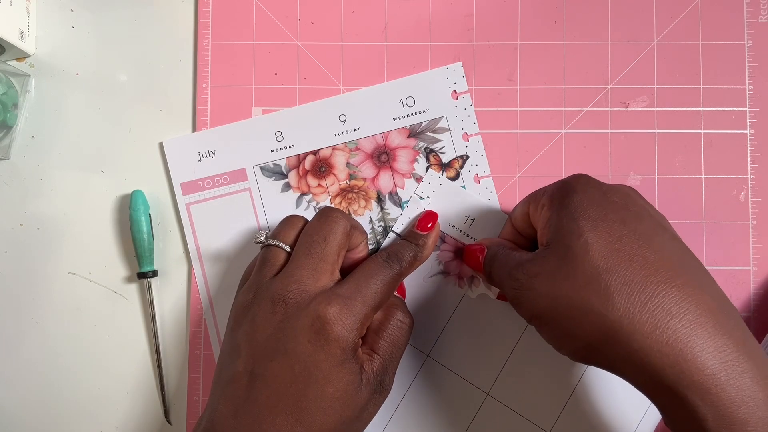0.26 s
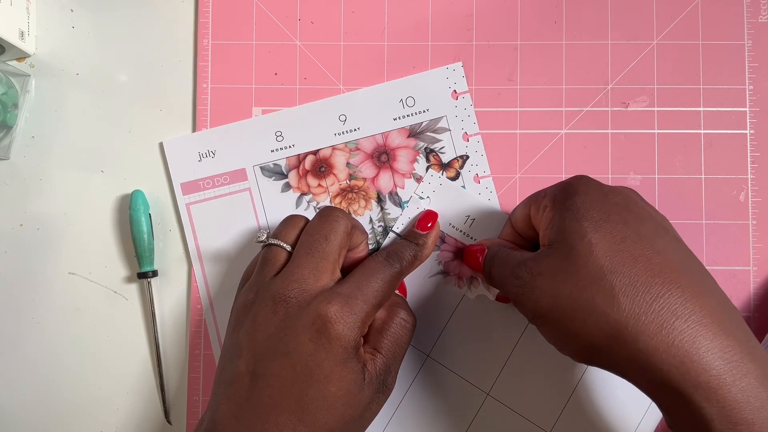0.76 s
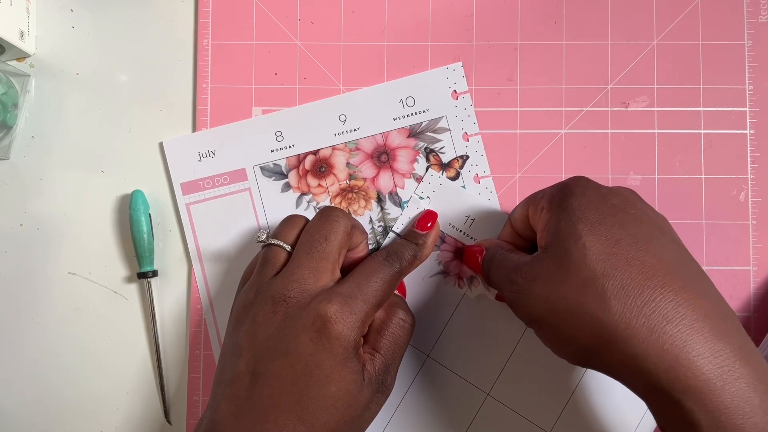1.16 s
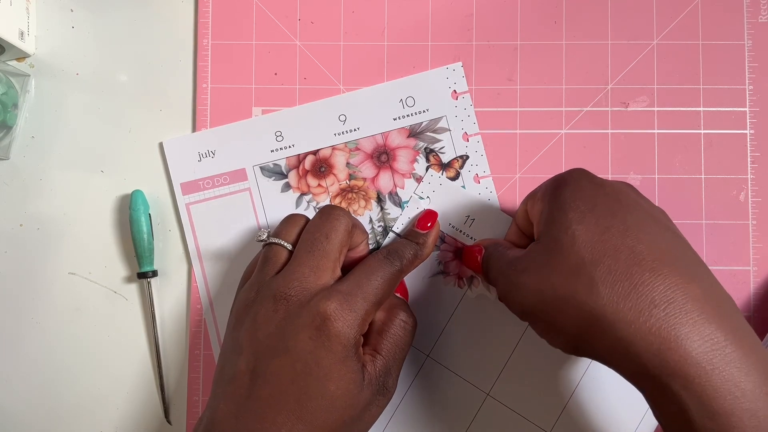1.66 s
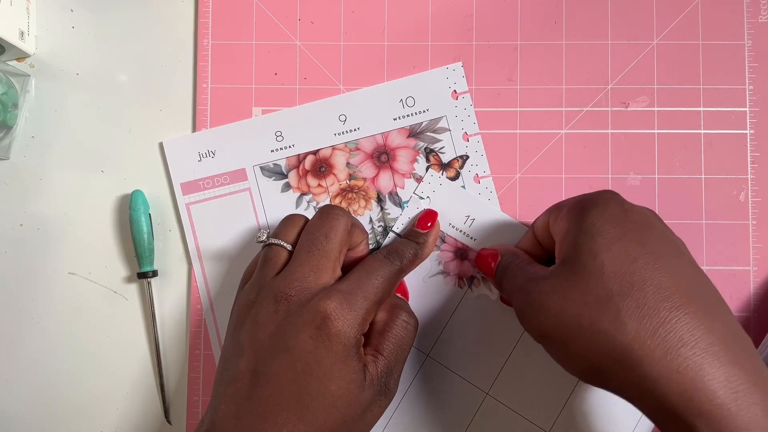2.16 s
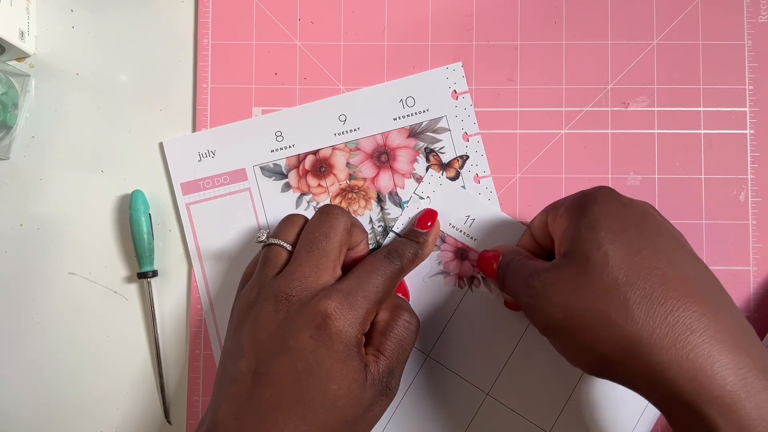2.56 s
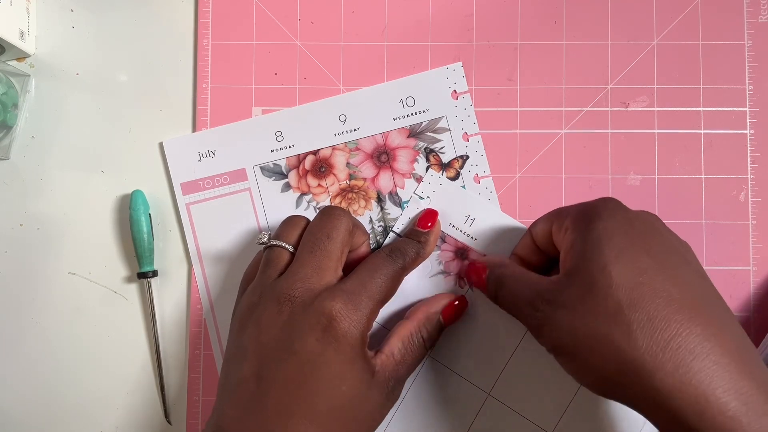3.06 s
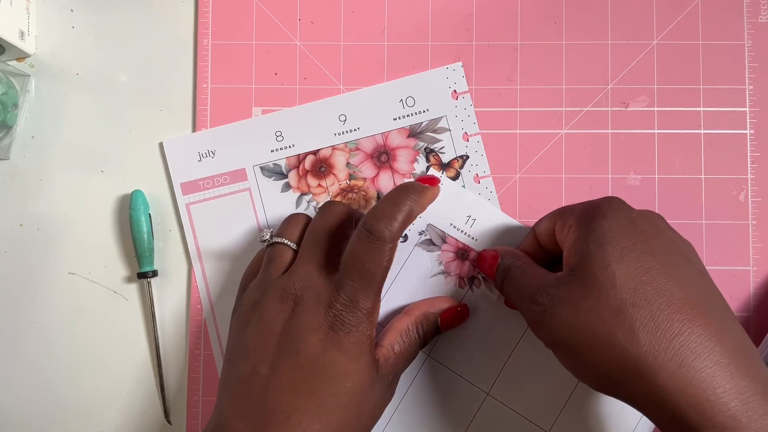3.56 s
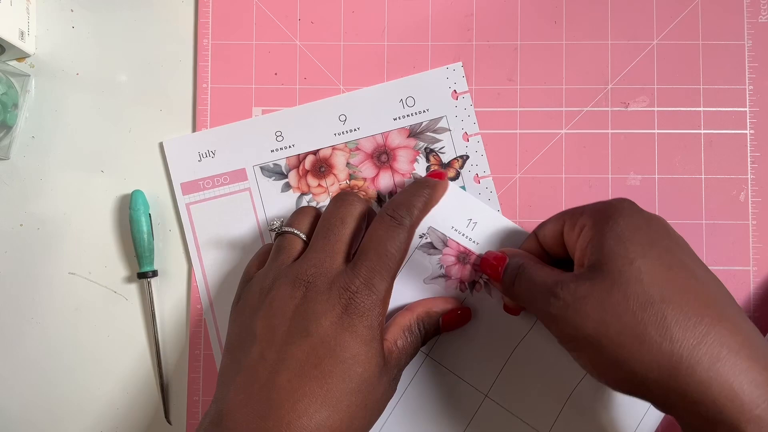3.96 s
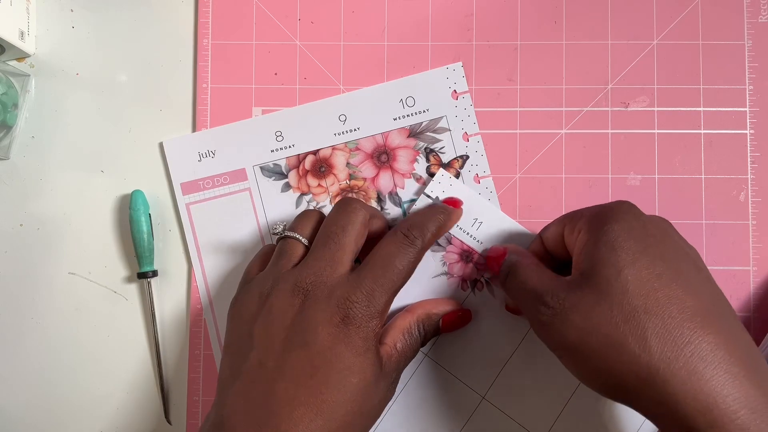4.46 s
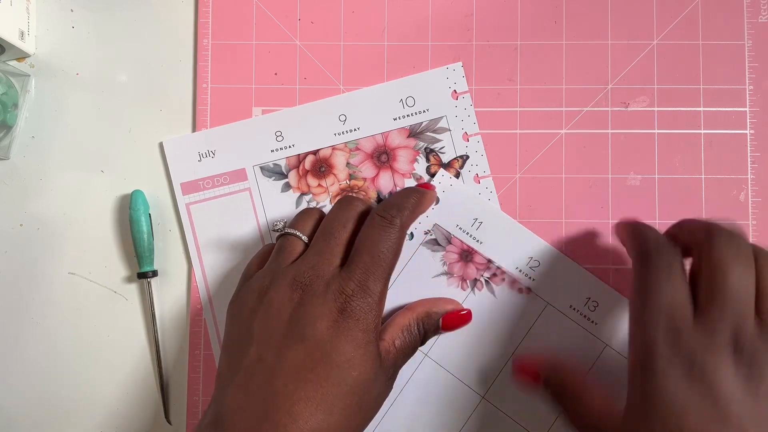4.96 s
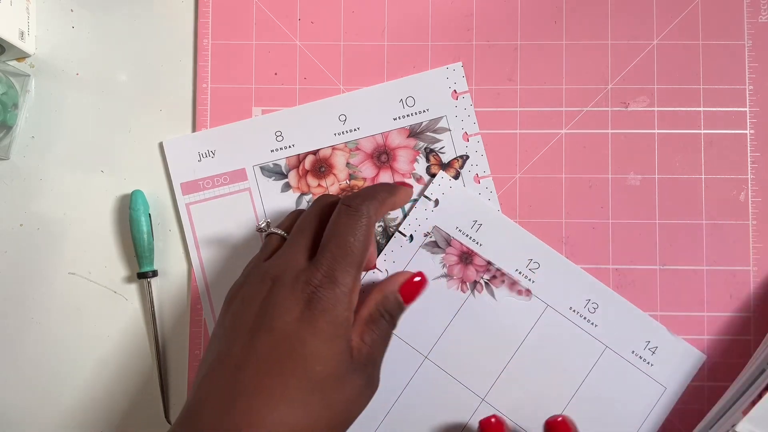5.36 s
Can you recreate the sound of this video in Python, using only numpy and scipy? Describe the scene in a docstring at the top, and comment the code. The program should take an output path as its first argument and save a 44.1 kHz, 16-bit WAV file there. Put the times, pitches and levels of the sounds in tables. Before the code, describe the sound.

Close, dry paper handling: sparse ticks, soft fingertip thuds, a busy burst of rustle and flaps, later one hard snap, above quiet fan hum.

```python
"""A sticker peels and is pressed on a paper page lying on a desk mat, heard close and in stereo.
Glue and paper let go in snaps: short runs of cracks, heard bare and striking the modes of the sheet.
Skin and sticker rub the page: grainy noise in bands, with wavering resonances lifted out of it.
Nails knock hollow notes, pages flap as short dull rings and fingertips shake the low desk modes.
Behind them fan and mains hum in wavering sines; the fan moves air as banded noise and squeaks faintly."""
import sys
import numpy as np
from scipy import signal
from scipy.fft import rfft, irfft, next_fast_len
from scipy.io import wavfile

SR = 44100
rng = np.random.default_rng(int(sys.argv[2]) if len(sys.argv) > 2 else 0)


def inscribe(sig):
    """Save sig as 16-bit PCM at rate SR to the path in sys.argv[1].

    A 1-D sig is mono; a 2-D sig holds one channel per row.
    Samples are clipped to [-1, 1] before scaling.
    """
    pcm = np.round(np.clip(np.atleast_2d(sig).T, -1, 1) * 32767)
    wavfile.write(sys.argv[1], SR, pcm.astype(np.int16))


N = 247128

# strokes of skin and sticker over the page, levels before the rub's makeup gain: [start t/s, length/s,
# rasp level at start/dB, rasp level at end/dB, rise/(dB/s), fall/(dB/s), low rasp over rasp/dB,
# skin hiss over rasp/dB, top hiss over hiss/dB, page body over rasp/dB]
STROKES = [(0.215, 0.0081, -63.5, -81, 903, 600, -3, -1, -2, -8),
           (0.538, 0.13, -76.5, -83, 908, 455, 6, 9.5, 8, -9),
           (1.83, 0.16, -75.5, -75.5, 602, 450, -4, 0, -1, 22),
           (2.011, 0.22, -69, -72.5, 398, 450, 9, 7, -3.5, 13),
           (2.337, 0.046, -70.5, -74, 600, 448, 13.5, 2.5, -10, 23.5),
           (2.483, 0.19, -77.5, -76.5, 602, 458, -6, 5.5, -3, -8),
           (2.62, 0.14, -74.5, -71, 603, 454, 11.5, -1, -14, 14.5),
           (2.875, 0.15, -65, -59, 900, 900, 4.5, -6, 1, -10),
           (2.984, 0.072, -62.5, -55, 3002, 450, 2.5, -4, 10, 6.5),
           (3.078, 0.062, -56.5, -51, 402, 1200, -5, 2, -0.5, -2),
           (3.177, 0.043, -63, -70.5, 600, 454, 9.5, 1.5, -10, 12),
           (3.226, 0.1, -55, -54, 1502, 499, 1.5, -0.5, 2, 9.5),
           (3.59, 0.059, -60.5, -51, 899.5, 450, 1, -3.5, 1, 1),
           (3.693, 0.02, -51, -52.5, 601, 600, -0.5, -3, 3, -8.5),
           (3.709, 0.014, -53, -56.5, 2998.5, 450, 9, 3, 1, 7),
           (3.745, 0.096, -65.5, -57, 600, 450, 7, 0, -2, 3.5),
           (3.876, 0.063, -53.5, -54.5, 402, 450, 4, -4, 2, -7),
           (3.939, 0.028, -53.5, -46.5, 900, 449, 5, -11, 8, -7),
           (3.978, 0.018, -46.5, -48.5, 902, 550, -2, -6.5, 6, -24),
           (4.019, 0.054, -66, -67.5, 597, 445, -2, -4.5, -3, 11),
           (4.278, 0.016, -64, -58.5, 899, 445, -5, -7.5, -16, -6),
           (4.419, 0.063, -60.5, -58, 3003, 600, -10.5, 0.5, 1, -9.5),
           (4.498, 0.026, -48.5, -58, 2003, 700, 2.5, 2, -7, 2.5),
           (4.539, 0.089, -53.5, -74.5, 3000, 450, -11, -2.5, 2, 3.5),
           (4.652, 0.014, -60, -62, 900, 900, 8, -2, -6, -2),
           (4.67, 0.028, -45, -65, 6004, 446, 3, 11, 2, 10.5),
           (4.713, 0.073, -66.5, -68, 604, 250, 8, -1, 9, 12.5),
           (5.146, 0.037, -70, -64.5, 2997.5, 600, 4, 6.5, 2, 15),
           (5.22, 0.17, -72, -73, 597.5, 453, 10, -9.5, -1, 20),
           (5.47, 0.017, -68.5, -59, 5999, 1189, -1.5, 8, 8, 1),
           (5.496, 0.043, -79, -80, 2998, 445, 3, 5, 7, -13)]


def from_db(db):
    """Amplitude gain of a level in dB."""
    return 10 ** (np.asarray(db) / 20)


def rms_one(x):
    """Scale a signal to unit power."""
    return x / np.sqrt(np.mean(x ** 2) + 1e-20)


def at_hz(points, hz):
    """Read a table of (Hz, value) on a log-frequency axis, flat beyond its ends."""
    table_hz, values = np.array(points).T
    return np.interp(np.log(hz), np.log(table_hz), values)


def drift(rate):
    """Slow random wander of spread 1: noise through two equal poles at rate (Hz), drawn every 40 samples."""
    r = np.exp(-80 * np.pi * rate / SR)
    noise = rng.standard_normal(N // 40 + 2002)
    slow = signal.lfilter([1], [1, -2 * r, r * r], noise)[2000:]  # drop the settling
    return np.interp(np.arange(N) / 40, np.arange(len(slow)), rms_one(slow))


def ring(x, hz, t60):
    """Damped resonator: a unit click sets a sine of height 1 ringing, down 60 dB after t60 seconds."""
    r, w = from_db(-60 / (t60 * SR)), 2 * np.pi * hz / SR
    return signal.lfilter([0, np.sin(w)], [1, -2 * r * np.cos(w), r * r], x + 1e-18)


def bands(spectrum, likeness, grain, gain_db):
    """Stereo noise in third-octave bands, unit power at 0 dB; gain_db(hz) moves each band in time."""
    edges = 20.5 * 2 ** np.arange(0, 9.7, 1 / 3)
    white = rng.standard_normal((2, 2, N)) * grain
    out, power = 0, 0
    for k, (low, high) in enumerate(zip(edges, edges[1:])):
        hz = np.sqrt(low * high)
        density_db = at_hz(spectrum, hz)
        power += from_db(density_db) ** 2 * (high - low)
        if hz < spectrum[0][0]:
            continue
        bandpass = signal.butter(3, [low, high], "band", fs=SR, output="sos")
        mid, side = signal.sosfilt(bandpass, white[k % 2])  # neighbouring bands use separate noises
        alike = np.clip(at_hz(likeness, hz), 0, 1)
        stereo = np.sqrt(1 + alike) * mid + np.sqrt(1 - alike) * side * [[1], [-1]]
        out = out + from_db(density_db + gain_db(hz)) * stereo
    return out * np.sqrt(SR / 4 / power)


def room(x):
    """Dense dull reflections: decaying lowpassed noise, unrelated in the two channels."""
    t60_s, build_up_s, tail_db, wall_cut_hz = .07, 0.00054, -26, 4350
    t = np.arange(int(t60_s * SR)) / SR
    envelope = from_db(-60 * t / t60_s) * np.clip(t / build_up_s, 0, 1)
    tail = rng.standard_normal((2, len(t))) * envelope
    tail = signal.sosfilt(signal.butter(2, wall_cut_hz, fs=SR, output="sos"), tail)
    return from_db(tail_db) * signal.fftconvolve(x[None], tail, axes=1)[:, :N]


def fan_and_mains_hum():
    """Hum lines of the fan and the mains: sines share one pitch wander and waver separately in level."""
    # hum lines of the fan and the mains: [f/Hz, rms level before wavering/dB]
    hum_lines = [(31.5, -68.5), (64.4, -54.5), (120, -61.5), (128.7, -54.5), (240, -75), (257.6, -66.5),
                 (322, -68), (387, -73.5)]
    t = np.arange(N) / SR
    time_wander = np.cumsum(0.00609 * drift(1.55)) / SR
    hum = np.zeros(N)
    for hz, db in hum_lines:
        gain = np.sqrt(2) * from_db(db + 3.0 * drift(5.5))
        hum += gain * np.sin(2 * np.pi * (hz * (t + time_wander) + rng.random()))
    return hum


def fan_air():
    """Moving air: banded stereo noise, each band drifting gently in level."""
    # tone of the air: [f/Hz, relative power density/dB per Hz]
    air_colour = [(20, -5.5), (30, 0.5), (42, 0.5), (60, 5), (90, -4.5), (120, 3.5), (160, -8), (220, -17),
                  (290, -11), (370, -15), (460, -15.5), (600, -15.5), (1000, -20.5), (2300, -24.5),
                  (2950, -32.5), (5900, -39), (7400, -55), (9300, -89), (11700, -59.5), (14000, -61.5),
                  (16500, -57.5)]
    # stereo width of the air: [f/Hz, left-right likeness]
    air_likeness = [(40, .9997), (80, .998), (130, .98), (300, .8), (600, .1), (1500, .1), (2400, .5),
                    (4000, .15), (6000, .75), (7500, 1)]
    air_db = -50.5
    return bands(air_colour, air_likeness, 1, lambda hz: air_db + 1.2 * drift(10))


def fan_squeak():
    """Faint squeaks: two harmonics swell and fade while their shared pitch rises and trembles."""
    # squeak harmonics: [multiple of the base pitch, peak level before wavering/dB]
    harmonics = [(2, -90), (3, -82)]
    # squeak onsets: [t/s]
    onsets = [.07, .78, 1.49, 2.2]
    length_s, base_hz, rise = .11, 4530, .03
    t = np.arange(N) / SR
    progress = sum(np.clip((t - s) / length_s, 0, 1) % 1 for s in onsets)  # 0 outside a squeak
    tremble = .011 * drift(120)
    turns = np.cumsum(base_hz * (1 + rise * progress + tremble)) / SR
    tone = sum(from_db(db + 3 * drift(40)) * np.sin(2 * np.pi * k * turns) for k, db in harmonics)
    return np.sin(np.pi * progress) * tone


def pushes():
    """A fingertip landing is a soft pulse of force that shakes the low modes of the desk."""
    # finger pushes: [t/s, force level/dB]
    landings = [(1.57, -42), (1.871, -40.5), (2.358, -38.5), (2.697, -36.5), (3.013, -51), (3.051, -38.5),
                (3.255, -40), (3.272, -44), (3.294, -50), (3.313, -36.5), (3.628, -41), (4.545, -44),
                (4.672, -37.5), (4.684, -36.5)]
    # desk modes: [f/Hz, level per force/dB, t60/s]
    desk_modes = [(76, -1.5, 0.092), (114.6, -1.5, 0.18), (174, -6, 0.083), (272, -12, 0.094),
                  (421, -5.5, 0.19)]
    force, soft = np.zeros(N), np.hanning(130)
    force[[int(s * SR) for s, db in landings]] = from_db([db for s, db in landings])
    force = np.convolve(force, soft / soft.sum())[:N]
    return sum((-1) ** k * from_db(db) * ring(force, hz, t60)
               for k, (hz, db, t60) in enumerate(desk_modes))


def taps():
    """A nail knock on the mat swells on one hollow note and drops to a lower one."""
    # nail knocks: [t/s, level/dB]
    knocks = [(1.8325, -41.5), (1.976, -51), (2.100, -48.5), (2.682, -35)]
    # the notes of a knock: [delay/s, length/s, f/Hz, level over the knock/dB]
    notes = [(0, .0075, 800, 0), (.006, .008, 600, -2)]
    out = np.zeros(N + SR)
    for s, db in knocks:
        for delay, length, hz, note_db in notes:
            t, at = np.arange(int(length * SR)) / SR, int((s + delay) * SR)
            swell = np.sin(np.pi * t / length)
            out[at:at + len(t)] += from_db(db + note_db) * swell * np.sin(2 * np.pi * hz * t)
    return out[:N]


def flaps():
    """The page flaps against the one below: a softened click sets off a short dull ring."""
    # page flaps: [t/s, level/dB, f/Hz]
    page_flaps = [(3.129, -49, 1200), (3.144, -42, 1260), (3.2467, -30, 1380), (3.2505, -33, 820),
                  (3.256, -35, 1240), (3.262, -35, 800), (3.27, -41, 1120), (3.298, -34, 1100),
                  (3.3024, -40, 1480), (3.315, -35.5, 1160), (3.322, -31.5, 1110), (3.33, -48, 990),
                  (4.648, -39.5, 790), (4.669, -26.5, 1020), (5.594, -34.5, 1060)]
    out, soft = np.zeros(N + SR), np.hanning(14)
    click = np.pad(soft / soft.sum(), (0, 2000))
    for s, db, hz in page_flaps:
        at = int(s * SR)
        out[at:at + len(click)] += from_db(db) * ring(click, hz, 0.009)
    return out[:N]


def stroke_level(over_db, falls, resting_db):
    """Level in dB: each stroke rises, glides from start to end level and dies away; powers add."""
    t = np.arange(0, N + 32, 32) / SR
    power = from_db(2 * resting_db)
    for (s, length, start_db, end_db, rise, *_), extra_db, fall in zip(STROKES, over_db, falls):
        glide = np.interp(t, [s, s + max(length, 1e-3)], [start_db, end_db])
        edges = rise * np.maximum(s - t, 0) + fall * np.maximum(t - s - length, 0)
        power = power + from_db(2 * np.maximum(glide + extra_db - edges, -200))
    return np.interp(np.arange(N) / SR, t, 10 * np.log10(power))


def rubbing():
    """Dense uneven grains: page body fills the low bands, rasp the middle and hiss the top."""
    # tone of the rub: [f/Hz, relative power density/dB per Hz]
    rub_colour = [(250, 10), (400, 2), (1200, -3), (1500, -4.5), (1850, -6.5), (2300, -2), (2950, -3),
                  (3700, 0), (4700, -5.5), (5900, 6.5), (7400, 3.5), (9000, -14.5), (12500, 0.5),
                  (15000, -17), (16500, -26)]
    # stereo width of the rub: [f/Hz, left-right likeness]
    rub_likeness = [(250, .85), (900, .1), (1600, .2), (2400, .6), (4000, .85), (6000, .9), (7500, 1)]
    # resonances of the stretched sheet: [f/Hz, level before wavering/dB, t60/s]
    rasp_peaks = [(1900, -2.5, 0.02), (2010, -1.5, 0.019), (2410, 0, 0.029), (3270, 5, 0.03),
                  (3614, -7.5, 0.037), (3880, 4, 0.023), (4314, -1, 0.014), (4420, -3, 0.015),
                  (6270, -1.5, 0.016), (6620, 3, 0.02)]
    # hands lying still on the page, before makeup gain
    resting_rasp_db, resting_hiss_db, resting_body_db = -91.5, -82.5, -65
    page_fall_db_per_s, makeup_db, stretch_share = 249, 4, .012

    fall, low_db, hiss_db, top_db, body_db = np.array(STROKES)[:, 5:].T
    rasp = stroke_level(0 * low_db, fall, resting_rasp_db)
    low = stroke_level(low_db, fall, resting_rasp_db)
    hiss = stroke_level(hiss_db, fall, resting_hiss_db)
    top = stroke_level(hiss_db + top_db, fall, resting_hiss_db)
    body = stroke_level(body_db, np.minimum(fall, page_fall_db_per_s), resting_body_db)

    def band_gain_db(hz):
        """Level of the layer that owns this band, with a drift of its own."""
        level = body if hz < 1600 else low if hz < 2900 else rasp if hz < 4900 else hiss if hz < 9000 else top
        return level + makeup_db + 1.5 * drift(25)

    grain = rms_one(from_db(1.4 * drift(130) + 2.46 * rng.exponential(1, N)))
    raw = bands(rub_colour, rub_likeness, grain, band_gain_db)
    # the stretched sheet lifts a few resonances of wandering pitch and level out of the grain
    lifted = 0
    for hz, db, t60 in rasp_peaks:
        turn = np.exp(2j * np.pi * hz * np.cumsum(1 + stretch_share * drift(12)) / SR)
        r = from_db(-60 / (t60 * SR))
        # shift the resonance to 0 Hz, smooth there, shift back
        narrow = 2 * np.real(turn * signal.lfilter([1 - r], [1, -r], raw / turn))
        lifted = lifted + from_db(db + 1.8 * drift(14)) * narrow
    return raw + lifted


def snaps():
    """A snap is a crack and weaker ones close behind, heard bare and striking every mode of the sheet."""
    # glue and paper snaps; each favours a pitch; level changes by its own slopes below and above it,
    # negative loss meaning gain: [t/s, relative level/dB, favoured f/Hz, loss below/(dB/octave),
    # loss above/(dB/octave)]
    releases = [(0.5426, -56.5, 4250, 26, -8), (0.5518, -54, 4320, 26, 2), (0.569, -52.5, 6700, 17, 7),
                (0.5855, -63, 6000, 10, 0), (0.611, -40, 5200, 38, -6), (0.623, -44, 5000, 11, -8),
                (1.5746, -50.5, 4220, 15, 6.5), (1.805, -59, 3680, 25, 4.5), (1.866, -48, 5070, 15, 6),
                (2.0307, -69, 6200, 12, 3), (2.0539, -58, 6400, 17, -6), (2.0925, -49, 5030, 27, -6),
                (2.1028, -50, 6600, 10, 9), (2.13, -34, 6300, 23, -1.5), (2.1702, -40.5, 4800, 20, 1),
                (2.178, -36, 5960, 7, 0), (2.317, -61.5, 4900, 14, 18), (2.333, -73, 4900, 10, 19),
                (2.3481, -36, 6480, 22.5, 49), (2.4168, -66, 5330, 8, 10), (2.972, -63, 2700, 11, 1),
                (2.9814, -21, 7400, 29, -15.5), (2.986, -45, 2980, 12, 7), (3.05, -52, 2720, -5, 8),
                (3.174, -44, 2230, -5, 6.5), (3.2304, -34, 4000, -2.5, 1.5), (3.2467, -52, 1790, 2, 1),
                (3.255, -50, 6200, 14, -9), (3.27, -43.5, 6140, 25, 17), (3.2973, -34.5, 6470, 4.5, -4),
                (3.316, -43.5, 3670, 16, 6), (3.573, -61, 6500, 8, 14), (3.617, -52, 6840, 8, -4),
                (3.6496, -45, 2300, 10, -3.5), (3.7121, -44, 2050, 4, 13), (3.8304, -51.5, 2290, 6, 14),
                (3.8315, -59, 3700, 6, 14), (4.27, -51, 4160, 8, 22), (4.486, -53, 3800, 11, 7),
                (4.4944, -45.5, 3750, 36, 2.5), (4.4998, -54, 6030, 7, 22), (4.519, -64, 3800, 12, 10),
                (4.5439, -32.5, 4300, 6.5, 9.5), (4.547, -47, 3330, 5, -3), (4.6462, -52.5, 3770, -1, 4),
                (4.6695, -22.5, 3360, 2.5, 3.5), (4.693, -46, 6400, 17, 3), (5.15, -81, 6200, 14, -1),
                (5.1882, -49, 6500, 16, -6), (5.4728, -58, 6000, 14, -12)]
    # sheet modes: [f/Hz, relative level/dB, t60/s]
    sheet_modes = [(1496, -23, 0.0052), (1870, -4, 0.0065), (2270, -3.5, 0.012), (2485, -2, 0.0072),
                   (3150, 1.5, 0.0051), (3430, 1, 0.0067), (3744, 3.5, 0.0073), (4310, 1.5, 0.0061),
                   (4450, -3, 0.0061), (4860, -0.5, 0.0068), (5410, 1.5, 0.0041), (6020, 9.5, 0.0043),
                   (7100, 6.5, 0.00247), (7280, -4, 0.0051), (8030, 4, 0.0051), (8800, 9, 0.00162),
                   (11240, -10.5, 0.012), (13100, 5.5, 0.006), (12960, 6, 0.0025), (13700, -1.5, 0.0052),
                   (15900, -23, 0.0045)]
    cracks_per_snap, crack_fade_db_per_s, makeup_db = 4, 13001, 6.0
    favour_db, favour_octaves, levels_off_hz = 4.5, .2, 10000
    bare_crack_db = -5.5  # against the clicks that drive the ring

    rows, out = np.array(releases), np.zeros(N)
    level_db, favoured_hz, below, above = rows[:, 1:].T
    late = np.cumsum(rng.uniform(.0005, 0.0013, (len(rows), cracks_per_snap)), axis=1)
    late -= late[:, :1]  # the first crack is on time
    at = ((rows[:, :1] + late) * SR).astype(int)
    cracks = from_db(-crack_fade_db_per_s * late) * rng.choice([-1, 1], late.shape)
    luck_db = rng.normal(0, 1.5, (len(rows), len(sheet_modes), cracks_per_snap))
    for k, (hz, db, t60) in enumerate(sheet_modes):
        octaves = np.log2(min(hz, levels_off_hz) / favoured_hz)
        mode_db = level_db + np.where(octaves < 0, below, -above) * octaves
        mode_db += favour_db * np.exp(-(octaves / favour_octaves) ** 2)
        clicks = np.zeros(N)
        np.add.at(clicks, at, from_db(mode_db[:, None] + db + makeup_db + luck_db[:, k]) * cracks)
        struck = (-1) ** k * ring(clicks, hz, t60) + from_db(bare_crack_db) * clicks
        # a mode radiates mainly around its own pitch
        near = signal.butter(1, [hz / 1.5, min(hz * 1.5, 20000)], "band", fs=SR, output="sos")
        out += signal.sosfilt(near, struck)
    return out


def scene():
    """Close hand sounds, the snaps and knocks with their room, over the fan and mains hum."""
    background = fan_and_mains_hum() + fan_air() + fan_squeak()
    cracks, knocks = snaps(), taps() + flaps()
    reflections = room(cracks + 1.34 * knocks)
    return cracks + knocks + reflections + pushes() + rubbing() + background


def record(dry):
    """Stereo widening: the two channels differ in level and phase by frequency; the top is cut."""
    # left channel over right channel: [f/Hz, level/dB]
    left_louder = [(200, 0), (350, 2.5), (700, 2), (1400, 3), (2500, 3), (3200, -1), (6000, -.5), (9000, 0)]
    # phase of the right channel behind the left: [f/Hz, lag/rad]
    right_lag = [(3800, 0), (5500, 1.3), (6900, 1.7), (7900, 2.85), (9000, 3.14), (10200, 3.5),
                 (11500, 4.6), (14200, 6.2), (17000, 6.4)]
    # the echo off the desk top thins a zone near 3 kHz and the treble: [f/Hz, level/dB]
    desk_echo = [(2600, -1), (3050, -3), (3600, -2), (4400, -2), (5200, -4.5), (6000, -7.5)]
    size = next_fast_len(N + 4096)
    hz = np.maximum(np.arange(size // 2 + 1) * SR / size, 1)
    # the left channel gets half the level and phase offset, the right channel its inverse
    half = from_db(at_hz(left_louder, hz) / 2) * np.exp(.5j * at_hz(right_lag, hz))
    spectrum = rfft(dry, size) * from_db(at_hz(desk_echo, hz))
    widened = irfft(spectrum * [half, 1 / half], size)[:, :N]
    top_cut = signal.cheby2(18, 70, 17050, fs=SR, output="sos")
    return signal.sosfilt(top_cut, widened)


dry = scene()
out = record(dry)
inscribe(out)
```